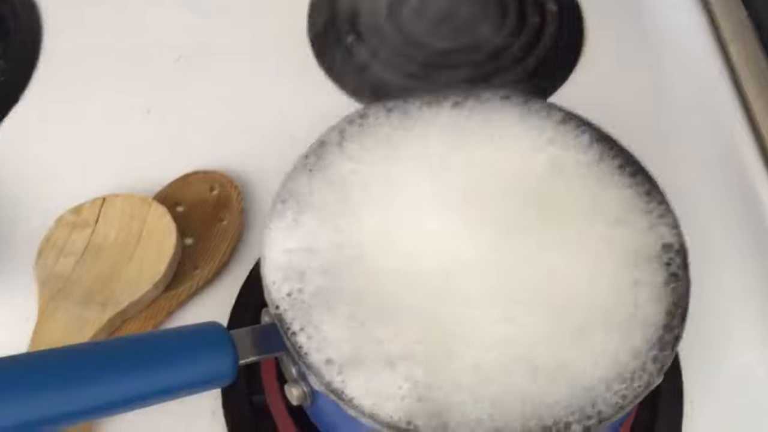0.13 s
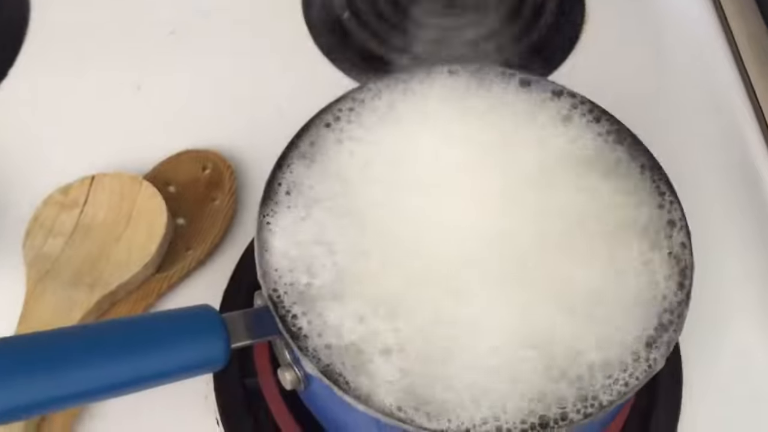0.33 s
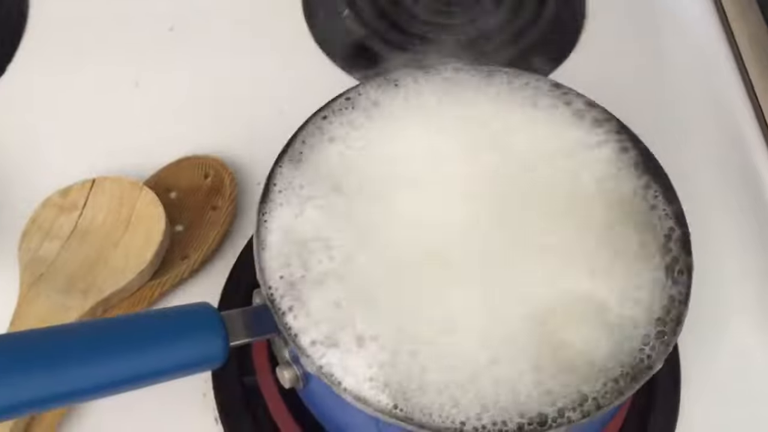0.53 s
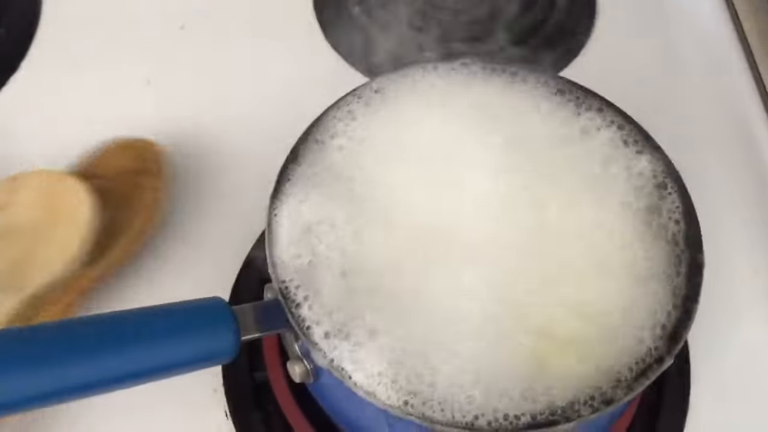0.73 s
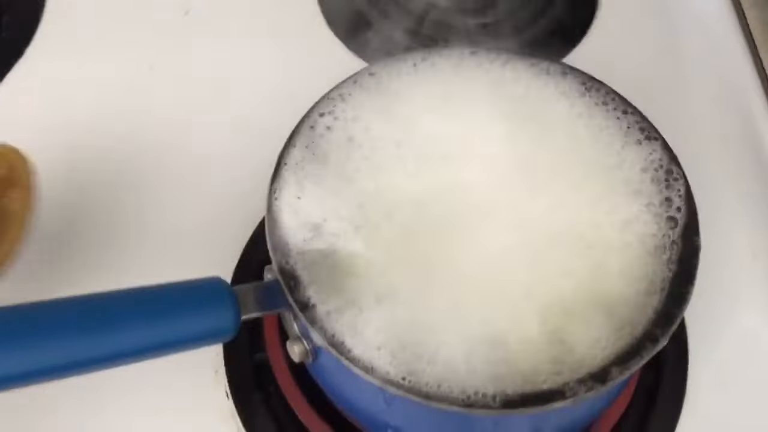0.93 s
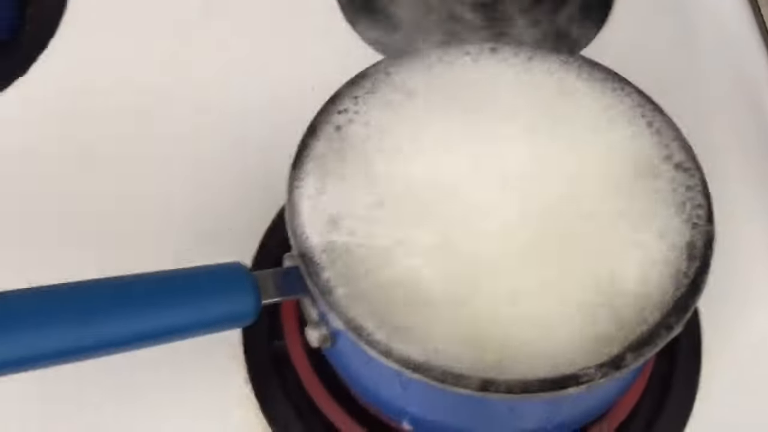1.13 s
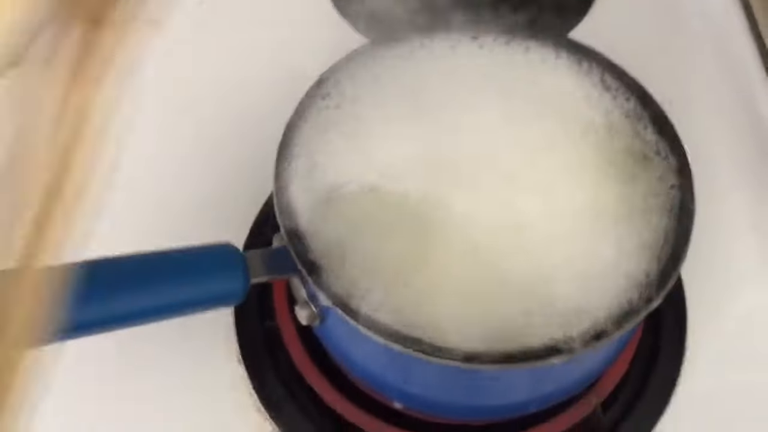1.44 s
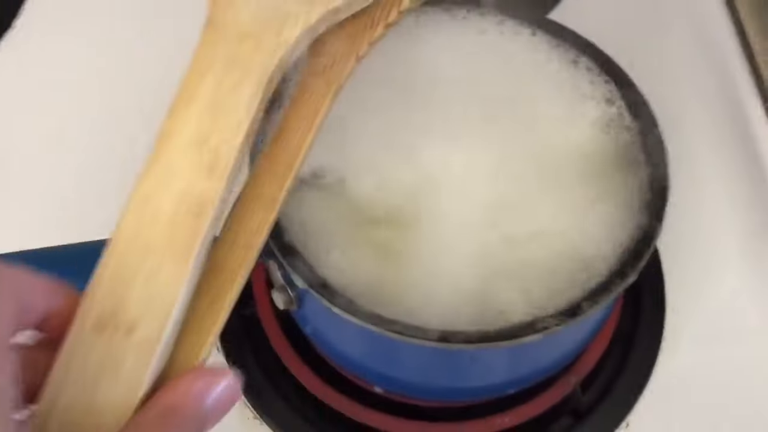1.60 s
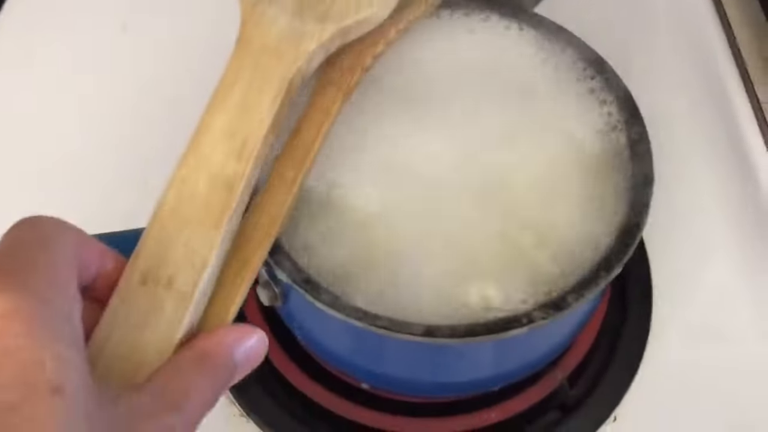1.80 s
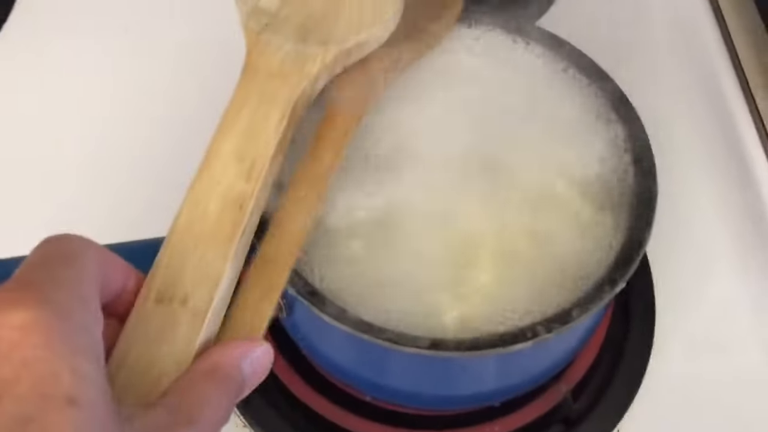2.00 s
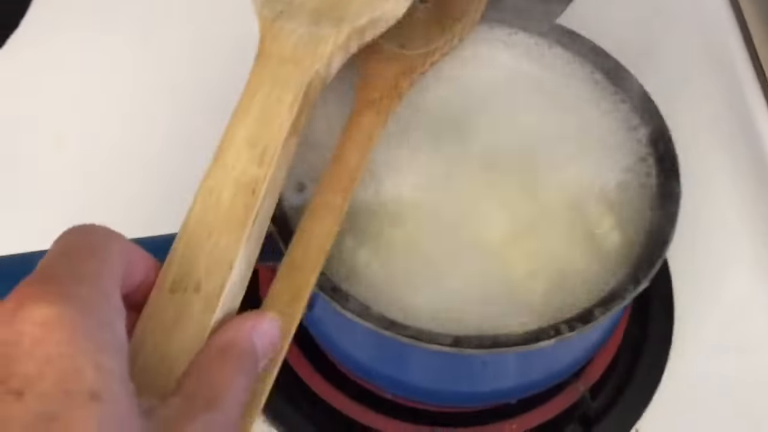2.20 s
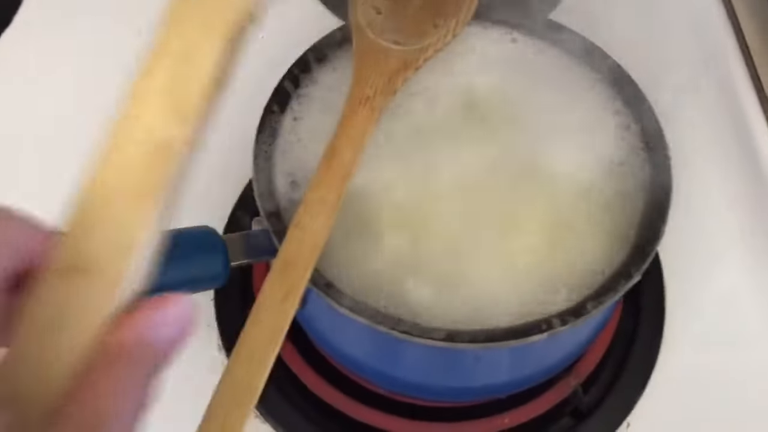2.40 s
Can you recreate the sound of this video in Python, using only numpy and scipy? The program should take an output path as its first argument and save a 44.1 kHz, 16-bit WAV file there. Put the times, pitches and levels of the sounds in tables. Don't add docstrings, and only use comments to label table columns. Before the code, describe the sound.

Boiling foam hisses in a pot, gradually calming, while wooden spoons knock twice on a stove

```python
import sys
import numpy as np
from scipy import signal
from scipy.fft import rfft, irfft, next_fast_len
from scipy.io import wavfile
from scipy.ndimage import uniform_filter1d, map_coordinates

SR = 44100
rng = np.random.default_rng(int(sys.argv[2]) if len(sys.argv) > 2 else 0)


def convert_level_to_amplitude(level_db):
    exponent = np.asarray(level_db, float) / 20
    return 10 ** exponent


def wav_out(sig):
    wavfile.write(sys.argv[1], SR, np.round(np.clip(np.atleast_2d(sig).T, -1, 1) * 32767).astype(np.int16))


N = 112454

# frequency [Hz], density [dB per Hz].
ROOM_SPECTRUM = [(18, -39), (30, -2.5), (64, -7), (114, -1.5), (483, -16.5), (561, -11.5), (809, -24.5),
                 (1110, -16), (1600, -43), (2080, -56), (3520, -120)]
# time [s], level [dB].
COMPRESSOR_LEVEL = [(0.14, -37), (0.6, -35), (0.64, -38), (0.76, -36), (1.65, -33), (1.73, -37.5),
                    (1.78, -64), (1.8, -51), (1.94, -50), (1.97, -81), (2.04, -55), (2.1, -82), (2.16, -59),
                    (2.55, -76)]
# frequency [Hz], level [dB], blur [Hz].
APPLIANCE_TONES = [
    (120.8, -60.5, .05),
    (198.7, -60, 5.85),
    (558, -64.5, 1),
    (1127, -60.5, 9.16),
]
# time [s], vigour [dB].
BOIL_VIGOUR = [(.12, -39), (.55, -40), (.7, -41), (1.1, -42), (1.5, -44.5), (1.75, -48), (2.15, -48.5),
               (2.3, -50.5), (2.55, -51.5)]
# frequency [Hz], density [dB per Hz].
FOAM_SPECTRUM = [(290, -45), (500, -10), (868, -4.5), (1620, -3.5), (2100, 1), (2650, -6), (6800, -8),
                 (15100, -14), (16000, -12.5)]
# centre [Hz], width [Hz], boost [dB].
POT_HOLLOW = [(1178, 67, -1), (2080, 200, 1), (3400, 170, 0.5), (4100, 740, -2), (6800, 520, 0.5),
              (5000, 340, -3.5), (7600, 460, -2.5), (10150, 300, -6.5)]
# frequency [Hz], density [dB per Hz].
LIQUID_SPECTRUM = [(70, -22), (130, -6), (260, 3.5), (400, -4.5), (600, -24), (900, -62)]
# start [s], peak [dB], pitch [Hz], 60 dB decay [s].
WOOD_THUDS = [(0.554, -36, 423, 0.054), (.914, -24.5, 400, 0.065), (.93, -36, 177, 0.23),
              (.93, -36, 492, 0.19), (0.916, -36.5, 295.5, 0.13), (1.001, -39, 105, 0.12),
              (1.049, -42, 178.6, 0.29), (1.037, -27.5, 429, 0.053), (2.001, -40, 192, 0.033),
              (2.005, -35.5, 392, 0.062), (2.173, -33, 367, 0.078), (2.202, -40, 287.4, 0.27),
              (2.24, -35.5, 169, 0.12), (2.25, -30, 363, 0.05)]
# start [s], peak [dB], centre [Hz], crack's 60 dB decay [s], ring [dB].
LIFT_KNOCKS = [
    (.9132, -21, 1320, 0.01, 7),
    (.921, -27, 1510, .07, -2),
    (.951, -29.5, 2600, 0.051, -11),
    (.968, -38.5, 1100, 0.074, -9.5),
    (.995, -35.5, 1090, 0.14, -14),
    (1.034, -35, 3400, .05, -10),
    (1.04, -28, 3260, 0.053, -10),
    (1.06, -42.5, 593, 0.22, -22),
    (1.088, -34, 1410, 0.047, -20),
]
# frequency [Hz], level [dB], 60 dB decay [s].
ENAMEL_MODES = [(400, -26, .08), (662, -11, 0.05), (858, -3.5, 0.05), (1040, -10, 0.064), (1174, -8, 0.073),
                (1360, 5.5, 0.021), (1486, 0.5, 0.086), (1744, -7, 0.063), (2000, -15, 0.12),
                (2160, -7, 0.037), (2490, -1.5, 0.038), (2772, -31, 0.054), (3252, 0.5, 0.045),
                (4250, -21, .05)]
# start [s], peak [dB], centre [Hz], crack's 60 dB decay [s], ring [dB].
LANDING_KNOCKS = [(2.002, -32, 1800, .015, -27), (2.003, -35, 5000, 0.0089, -21),
                  (2.008, -37, 610, 0.07, -27), (2.038, -38, 700, 0.026, -27),
                  (2.0495, -30.5, 1030, .035, -12), (2.051, -35.5, 2800, 0.022, -18),
                  (2.116, -34, 10000, .006, -40), (2.1697, -7.5, 2480, 0.0089, -12),
                  (2.17, -21, 6340, 0.016, -32), (2.1701, -24, 13000, 0.009, -48),
                  (2.172, -25, 2500, 0.028, -41), (2.186, -23, 1850, 0.047, -4.5),
                  (2.198, -33, 825, .05, 5), (2.224, -27.5, 1310, 0.043, -7),
                  (2.245, -30.5, 1390, 0.087, -6.5), (2.259, -37.5, 870, .05, 4),
                  (2.288, -37, 1110, 0.14, -25), (2.307, -42.5, 1760, 0.031, -11)]
# frequency [Hz], level [dB], 60 dB decay [s].
RIM_MODES = [(668, -12, 0.15), (885.4, 4.5, 0.08), (842, -16, 0.11), (1350, -9, 0.036), (1540, -5, 0.04),
             (1890, -8, 0.11), (2239, -13.5, 0.095), (2600, -6.5, 0.022), (2930, 2, 0.02),
             (3150, -11, 0.17), (3110, -20, 0.16), (4058, -10.5, 0.14), (5631, -2, 0.041),
             (7030, 10.5, 0.027)]
# frequency [Hz], 60 dB decay [s].
KITCHEN_DECAY = [(150, 0.93), (1000, 0.23), (3000, 0.16), (6000, 0.11), (12000, 0.082)]

START_S = .1205
ROOM_DB, WET_DB = -51.5, -8
HUM_HZ, HUM_WANDER_HZ, OCTAVE_DB, OCTAVE_PHASE = 59.33, 0.031, -22, 0.2
POPS_PER_S, POP_SPREAD_DB, POP_SHARE = 6000, 2.5, .2
BODY_DB, BODY_GROWS, BODY_HZ = -2.5, 1.83, 3240
RUMBLE_DB, RUMBLE_GROWS = -16, 1
REACH_OCTAVES, CRACK_OCTAVES = 0.94, 0.64
WOOD_ATTACK_S, STEEL_ATTACK_S = 0.0012, 0.00022


def unit(x):
    return x / np.sqrt(np.mean(x ** 2) + 1e-20)


def along(points, hz):
    f, v = np.transpose(points)
    return np.interp(np.log(hz + 1), np.log(f + 1), v)


def curve(rows):
    s, v = np.transpose(rows)
    return np.interp(np.arange(N) / SR, s, v)


def wobble(rate):
    return map_coordinates(rng.standard_normal(400), [np.arange(N) * rate / SR])


def filtered(x, response):
    m = next_fast_len(N + SR // 2)
    return irfft(rfft(x, m) * response(np.fft.rfftfreq(m, 1 / SR)), m)[:N]


def patchy(patchy_db):
    z = signal.stft(rng.standard_normal(N), nperseg=512)[2]
    field = uniform_filter1d(rng.standard_normal(z.shape), 6, 0)
    field = uniform_filter1d(field, 12, 1)
    return unit(signal.istft(z * convert_level_to_amplitude(patchy_db * unit(field)), nperseg=512)[1][:N])


def room_tone():
    return convert_level_to_amplitude(ROOM_DB) * unit(filtered(patchy(0.5), lambda f: convert_level_to_amplitude(along(ROOM_SPECTRUM, f))))


def compressor():
    turn = 2 * np.pi * np.cumsum(HUM_HZ + HUM_WANDER_HZ * wobble(4.3)) / SR
    wave = np.sin(turn) + convert_level_to_amplitude(OCTAVE_DB) * np.sin(2 * turn + OCTAVE_PHASE)
    return np.sqrt(2) * convert_level_to_amplitude(curve(COMPRESSOR_LEVEL)) * wave


def appliance_tones():
    out = np.zeros(N)
    for hz, db, blur_hz in APPLIANCE_TONES:
        level = np.sqrt(2) * convert_level_to_amplitude(db + 1.2 * wobble(8.85))
        out += level * np.sin(2 * np.pi * np.cumsum(hz + blur_hz * wobble(30)) / SR)
    return out


def boil():
    vigour_db = curve(BOIL_VIGOUR)
    peak_db = vigour_db.max()
    calm_db = vigour_db - peak_db

    def colour(f):
        hollow_db = sum(db * np.exp(-((f - hz) / width) ** 2) for hz, width, db in POT_HOLLOW)
        return convert_level_to_amplitude(along(FOAM_SPECTRUM, f) + hollow_db)

    def low(f):
        return 1 / np.sqrt(1 + (f / BODY_HZ) ** 4)

    chance, sign, size = rng.random((3, N))
    pops = (chance < POPS_PER_S / SR) * np.sign(sign - .5) * convert_level_to_amplitude(-POP_SPREAD_DB * np.log(size + 0.024))
    burst = np.sqrt(POP_SHARE) * unit(pops) + np.sqrt(1 - POP_SHARE) * patchy(1.16)
    fizz = unit(filtered(burst, lambda f: colour(f) * np.sqrt(1 - low(f) ** 2)))
    body = unit(filtered(patchy(-2.1), lambda f: colour(f) * low(f)))
    rumble = unit(filtered(patchy(2.5), lambda f: convert_level_to_amplitude(along(LIQUID_SPECTRUM, f))))

    fizz *= convert_level_to_amplitude(vigour_db + 1.45 + 0.13 * wobble(10.2))
    body *= convert_level_to_amplitude(peak_db + BODY_DB + BODY_GROWS * calm_db + .4 * wobble(9.1))
    rumble *= convert_level_to_amplitude(peak_db + RUMBLE_DB + RUMBLE_GROWS * calm_db)
    return fizz + body + rumble


def thuds():
    out, t = np.zeros(N + SR), np.arange(SR // 2) / SR
    for s, db, hz, t60 in WOOD_THUDS:
        envelope = convert_level_to_amplitude(db - 60 * t / t60) * (1 - np.exp(-t / 0.0025))
        out[round(s * SR):][:len(t)] += envelope * np.sin(2 * np.pi * hz * t)
    return out[:N]


def knocks(contacts, modes, attack_s):
    out, t = np.zeros(N + SR), np.arange(SR // 2) / SR
    for s, db, centre_hz, crack_t60, ring_db in contacts:
        ring = np.zeros(len(t))
        for hz, level_db, t60 in modes:
            reach_db = -6 * (np.log2(hz / centre_hz) / REACH_OCTAVES) ** 2
            mode_db = level_db + reach_db + rng.standard_normal()
            ring += convert_level_to_amplitude(mode_db - 60 * t / t60) * np.sin(2 * np.pi * hz * t)
        ring *= convert_level_to_amplitude(ring_db) * (1 - np.exp(-t / attack_s))
        edges = centre_hz * 2 ** np.array([-CRACK_OCTAVES, CRACK_OCTAVES])
        edges = np.clip(edges, 50, SR / 2.2)
        band = signal.lfilter(*signal.butter(2, edges, "band", fs=SR), rng.standard_normal(len(t)))
        crack = 0.56 * unit(band) * convert_level_to_amplitude(-60 * t / crack_t60)
        out[round(s * SR):][:len(t)] += convert_level_to_amplitude(db) * (ring + crack)
    return out[:N]


def kitchen(x):
    hz, t, z = signal.stft(rng.standard_normal(SR // 2), SR, nperseg=256)
    decay = convert_level_to_amplitude(-60 * t / along(KITCHEN_DECAY, hz)[:, None])
    tail = signal.istft(z * decay, SR, nperseg=256)[1]
    late = np.pad(x, (150, 0))
    return signal.fftconvolve(late, tail / np.linalg.norm(tail))[:N]


def scene():
    background = room_tone() + compressor() + appliance_tones()
    lift = knocks(LIFT_KNOCKS, ENAMEL_MODES, WOOD_ATTACK_S)
    land = knocks(LANDING_KNOCKS, RIM_MODES, STEEL_ATTACK_S) + thuds()
    answer = convert_level_to_amplitude(WET_DB) * (kitchen(lift) + kitchen(land))
    mono = background + boil() + lift + land + answer
    return np.array([mono, mono])


def roll_off(x):
    return signal.sosfilt(signal.butter(12, 16860, fs=SR, output="sos"), x)


def record(dry):
    t = np.arange(N)
    opened = dry[0] * (t > START_S * SR)
    mono = filtered(opened, lambda f: (f < 15800) * f ** 2 / (f ** 2 + 35 ** 2))
    mono = mono * (t > (START_S - .003) * SR)
    return roll_off(np.array([mono, mono]))


dry = scene()
out = record(dry)
wav_out(out)
```